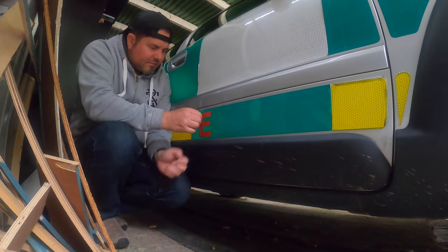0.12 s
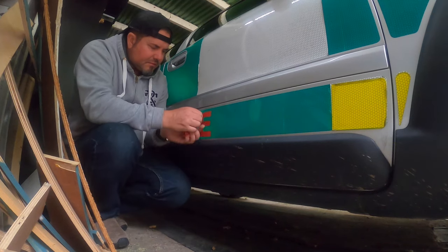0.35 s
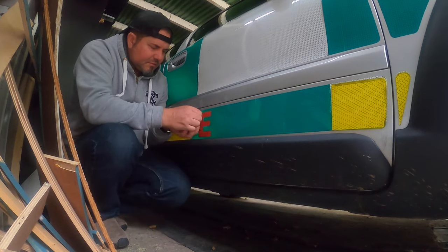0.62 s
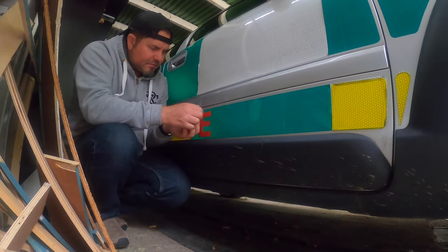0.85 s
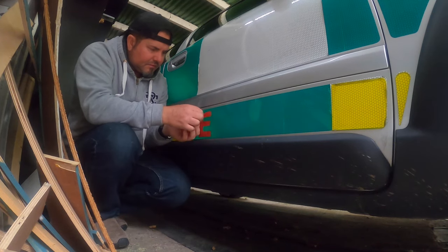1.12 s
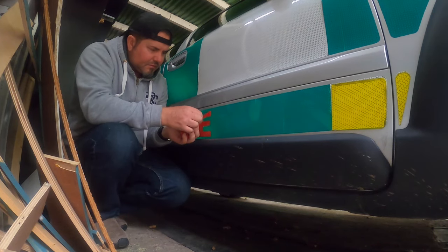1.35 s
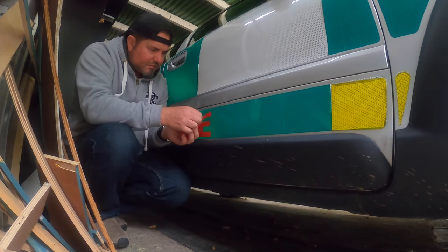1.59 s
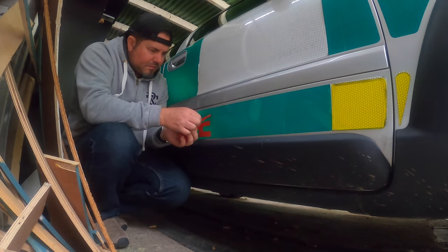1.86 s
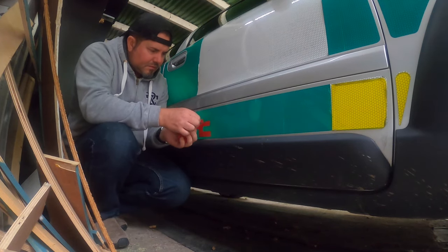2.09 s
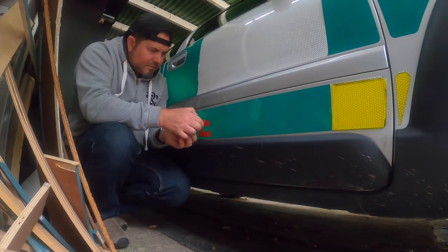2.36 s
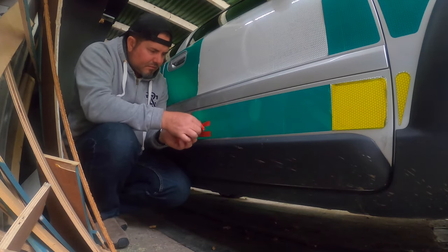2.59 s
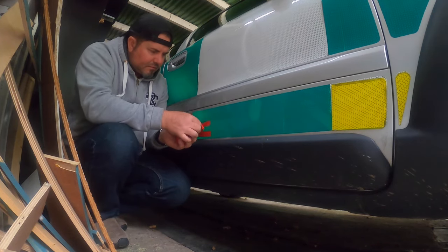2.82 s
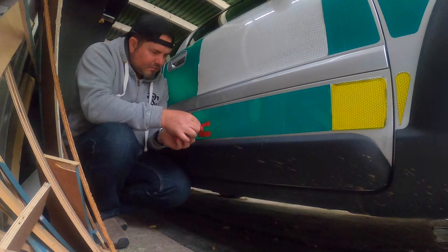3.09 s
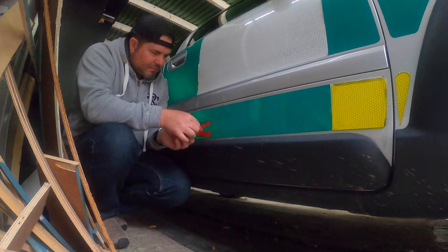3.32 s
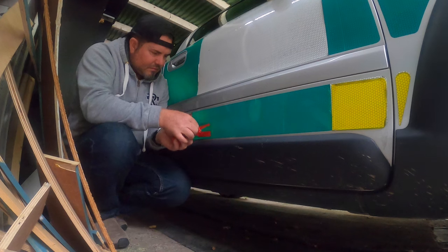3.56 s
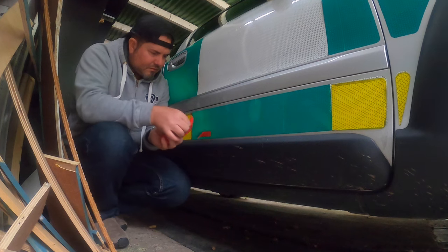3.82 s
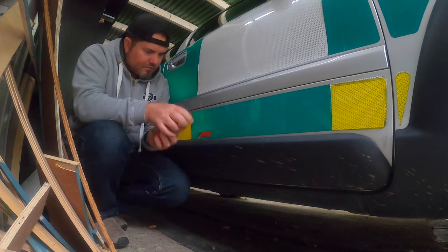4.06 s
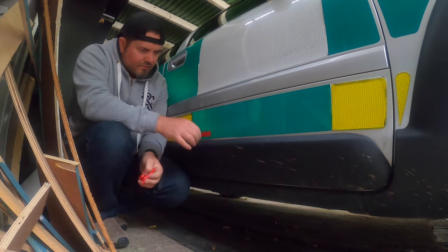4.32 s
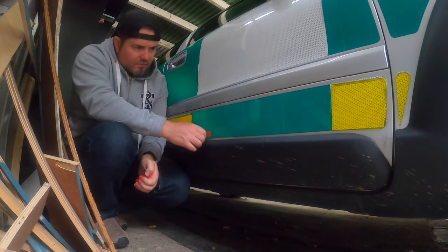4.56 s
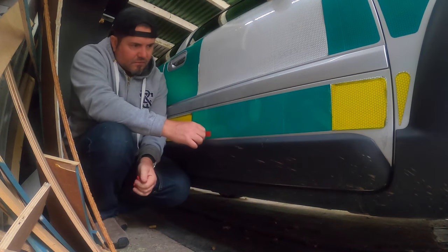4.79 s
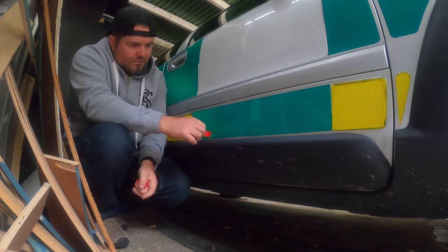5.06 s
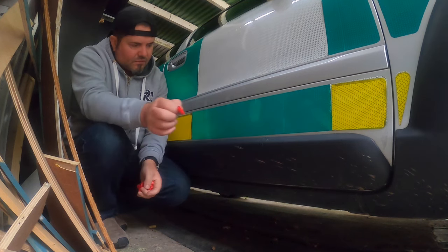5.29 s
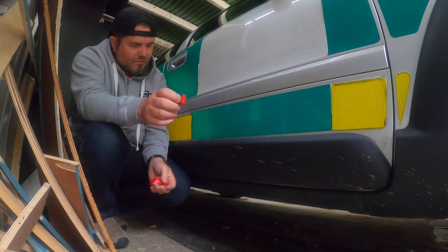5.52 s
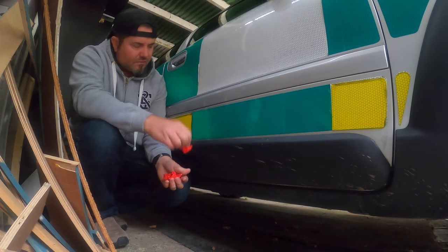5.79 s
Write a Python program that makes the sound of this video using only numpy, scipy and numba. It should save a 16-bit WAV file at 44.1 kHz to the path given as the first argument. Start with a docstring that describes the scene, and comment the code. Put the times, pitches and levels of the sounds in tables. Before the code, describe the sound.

Close stereo pickup, about an arm's length away in a small, nearly dry garage. Fingernails pick vinyl off a car door with sparse, small ticks and soft glue crackle. A sharp snap comes early, a double rap midway, another snap just after. Then a loud snap with a deep panel boom, a dense bright flurry of clicks, a short descending strip, a second boom and a few last ticks over low rumble.

```python
"""Fingernails pick vinyl letters off a car door in a garage, an arm's length from two microphone ports.
Nails tick, scratch and rap as short shaped noise bursts and ringing trim; the film crackles as its glue
lets go, made from random slips sent through resonances. Hard tugs make the door panel boom as ringing modes,
and it creaks in short low noises. A drawn-out strip, a rubbing knuckle and a thin whistle join in
over a low rumble, which swells with two of the booms, and a faint hiss."""
import sys
import numpy as np
from scipy import signal
from scipy.fft import rfft, irfft
from scipy.io import wavfile
from scipy.ndimage import uniform_filter1d
from numba import njit

SR = 44100
rng = np.random.default_rng(int(sys.argv[2]) if len(sys.argv) > 2 else 0)


def unload_wav(signal):
    """Save mono or channel-first audio to the path in sys.argv[1] as 16-bit WAV at rate SR, clipped to [-1, 1]."""
    wavfile.write(
        sys.argv[1],
        SR,
        np.round(np.clip(np.atleast_2d(signal).T, -1, 1) * 32767).astype(np.int16),
    )


def boost_factor(decibels):
    """Convert a level in decibels to a linear amplitude factor."""
    exponent = np.asarray(decibels, float) / 20
    return 10 ** exponent


N = 260626
T = np.arange(N) / SR

# Glue letting go.
# Each row: start in seconds, level in dB of the low hollow, of the middle hollow, and of the treble.
PEEL_LEVELS = [(0.0, -69, -65.5, -85), (0.15, -70.5, -66, -82), (0.24, -66, -61, -73),
               (0.36, -68, -67, -74.5), (0.5, -63.5, -64.5, -65.5), (0.89, -68, -69, -85),
               (0.97, -62, -60.5, -64.5), (1.15, -72, -59, -78), (1.35, -65, -53, -68),
               (1.55, -63.5, -65, -71.5), (1.86, -61, -65.5, -68), (2.3, -65.5, -68.5, -70),
               (2.9, -70.5, -68.5, -76.5), (3.21, -62.5, -58, -67), (3.5, -65, -75, -75),
               (3.8, -57.5, -66, -54), (3.97, -53, -62, -62), (4.03, -62, -75, -113), (4.15, -78, -72, -61),
               (4.25, -56, -57, -50.5), (4.42, -63.5, -75, -55.5), (4.51, -65.5, -68, -74),
               (4.65, -60.5, -67, -57), (4.8, -72, -101, -96), (5.0, -62.5, -62, -57.5),
               (5.2, -51.5, -61, -61), (5.4, -71, -63, -59), (5.66, -74, -82, -65.5),
               (5.91, -79, -67, -65.5)]


def unit(x):
    """Scale to rms 1."""
    return x / np.sqrt(np.mean(x ** 2))


def curve(table):
    """Draw straight lines between the rows of a time table: one value a sample for each column."""
    s, *columns = np.transpose(table)
    return [np.interp(T, s, c) for c in columns]


@njit
def svf(x, hz, width):
    """Band-pass with a centre that may move, gain 1 at the centre."""
    y, b, l = np.empty(len(x)), 0., 0.
    for i in range(len(x)):
        g, k = np.tan(np.pi * hz[i] / SR), width / hz[i]
        v = (b + g * (x[i] - l)) / (1 + g * (g + k))
        b, l, y[i] = 2 * v - b, l + 2 * g * v, k * v
    return y


def svf_twice(x, hz, width):
    """Moving band-pass applied twice, for steeper sides."""
    once = svf(x, hz, 1. * width)
    return svf(once, hz, 1. * width)


def steep(x, hz, width):
    """Fixed band-pass applied twice, rms 1."""
    return unit(svf_twice(x, np.full(len(x), 1. * hz), width))


def coloured(points):
    """Noise with a spectrum of (Hz, dB) points, rms 1."""
    hz, db = np.transpose(points)
    f = np.maximum(np.fft.rfftfreq(N, 1 / SR), 1)
    gain = boost_factor(np.interp(np.log(f), np.log(hz), db))
    return unit(irfft(rfft(rng.standard_normal(N)) * gain, N))


def crackle(share, spread_db, patchy_db):
    """Tiny slips: a share of the samples fire, few of them large, in patches some 20 ms long."""
    fired = rng.random(N) < share
    size_db = spread_db * np.minimum(rng.exponential(size=N), 5)
    patches = uniform_filter1d(np.repeat(rng.standard_normal(N // 600 + 1), 600)[:N], size=600)
    return unit(fired * rng.standard_normal(N) * boost_factor(size_db + patchy_db * patches))


def wander():
    """Slow chance, four new values a second with smooth steps between them, rms 1."""
    k = SR // 4
    return unit(uniform_filter1d(np.repeat(rng.standard_normal(N // k + 1), k)[:N], size=k))


def ports(x):
    """Two microphone ports hear one source with their own level and lag."""
    # Each row: frequency in Hz, left minus right in dB.
    port_levels = [(60, 1), (110, 0.54), (200, 1.5), (380, 0), (700, -0.5), (1290, 1), (2380, 3.5),
                   (4400, 3.5), (8120, -0.5), (15000, -3.5)]
    # Each row: frequency in Hz, how far the left leads in radians.
    port_leads = [(0, -0.12), (600, 0.74), (2700, -0.75), (4600, -0.97), (7300, -1.5), (9600, -1.5),
                  (12000, -1.5), (16000, -2)]
    f = np.maximum(np.fft.rfftfreq(N, 1 / SR), 1)
    hz, level_db = np.transpose(port_levels)
    db = np.interp(np.log(f), np.log(hz), level_db)
    lead = np.interp(f, *np.transpose(port_leads))
    # each port takes half of the difference
    half = boost_factor(db / 2) * np.exp(.5j * lead)
    return irfft(rfft(x) * np.array([half, 1 / half]), N)


def rumble_and_hiss():
    """Low rumble of the garage, swelling as the door booms at 3.97 and 5.35 s; hiss partly unrelated in the ports."""
    # Colour of the rumble. Each row: frequency in Hz, relative level in dB per Hz.
    rumble_colour = [(12, -36), (20, -18), (48, 1.5), (101, -5), (130, 0), (147, -8), (163, -18),
                     (216, -14.5), (243, -28), (274, -24.5), (348, -34), (375, -31.5), (700, -44),
                     (910, -71), (1540, -120)]
    # Level of the rumble, raised where the door booms. Each row: time in seconds, level in dB.
    rumble_levels = [(0.0, -40), (0.62, -39.5), (1.32, -40.5), (1.91, -45), (2.16, -39), (3.65, -40.5),
                     (3.97, -34.5), (4.16, -41), (4.64, -40), (4.95, -42.5), (5.35, -31.5), (5.51, -42),
                     (5.91, -44.5)]
    # Colour of the hiss. Each row: frequency in Hz, relative level in dB per Hz.
    hiss_colour = [(180, 6.5), (300, 0), (571, -10.5), (849, -14), (1140, -17), (1640, -5), (3340, -5),
                   (4000, -4.5), (7620, -12.5), (12300, -30), (15500, -55)]
    side = np.array([[1], [-1]])
    rumble = ports(coloured(rumble_colour)) + 0.028 * side * coloured(rumble_colour)
    hiss = ports(coloured(hiss_colour)) + 0.5 * side * coloured(hiss_colour)
    return boost_factor(curve(rumble_levels)[0]) * rumble + boost_factor(-60) * hiss


@njit
def walls(x, lags, gain, damp):
    """Echoes: eight delay lines that feed each other, duller on every round."""
    line, soft, out = np.zeros((8, 4096)), np.zeros(8), np.zeros((2, len(x)))
    for i in range(len(x)):
        total = 0.
        for k in range(8):
            soft[k] += (1 - damp) * (gain[k] * line[k, (i - lags[k]) & 4095] - soft[k])
            total += soft[k]
            out[k % 2, i] += soft[k]
        for k in range(8):
            line[k, i & 4095] = x[i] + soft[k] - total / 4
    return out


def whistle():
    """A two-strand squeak near the top of hearing: crackling noise in two narrow moving bands."""
    # Each row: time in seconds, pitch in Hz of the upper strand, its level in dB.
    whistle_path = [(.2, 12300, -100), (.27, 12600, -80), (.38, 13800, -76), (.45, 13200, -73),
                    (.53, 12400, -85), (.58, 12150, -100)]
    hz, db = curve(whistle_path)
    air = crackle(share=0.5, spread_db=1.5, patchy_db=4)
    strands = unit(svf(air, hz, 300.)) + 0.6 * unit(svf(air, 0.88 * hz, 400.))
    return boost_factor(db) * strands


def rub():
    """A knuckle judders on the paint; the mid resonances bend up and down with the pressure."""
    # Each row: time in seconds, level in dB, pitch factor for all the rings.
    rub_path = [(.705, -80, 0.95), (.713, -39.5, 0.91), (.73, -41, 0.98), (.745, -46, 0.95),
                (.765, -46.5, 0.86), (.785, -63, 0.92), (.8, -65, 1)]
    # Each row: ring in Hz before the pitch factor, width in Hz, relative level in dB.
    rub_rings = [(600, 150, 6.5), (744, 210, 10), (1176, 300, 9.5), (1335, 120, 8)]
    db, bend = curve(rub_path)
    slips = crackle(share=0.4, spread_db=2.5, patchy_db=2.5)
    rings = sum(boost_factor(ring_db) * svf_twice(slips, hz * bend, width) for hz, width, ring_db in rub_rings)
    return boost_factor(db) * unit(rings)


def strip():
    """The last strip of free film rings lower as it is pulled longer; an overtone grows with it."""
    # Each row: time in seconds, ring in Hz, level of the ring in dB.
    strip_path = [(5.03, 3740, -76), (5.07, 3400, -54), (5.11, 3020, -49.5), (5.14, 2350, -50),
                  (5.19, 2050, -50), (5.23, 1380, -48.5), (5.31, 1010, -47), (5.33, 1050, -75)]
    hz, db = curve(strip_path)
    slips = crackle(share=0.9, spread_db=0.5, patchy_db=1.2)
    tone = unit(svf_twice(slips, hz, 650))
    overtone = unit(svf_twice(slips, 3.1 * hz, 1200))
    sounding = (T > strip_path[0][0]) * (T < strip_path[-1][0])
    return sounding * boost_factor(db) * (tone + 400 / hz * overtone)


def pops():
    """Threads of glue break one by one while the film lifts, each a short scratch in one ring."""
    # Each row: ring in Hz, width in Hz.
    pop_rings = [(1500, 1100), (2300, 1000), (3400, 1100), (4800, 1200), (7500, 880)]
    pops_per_s, spread_db, fade_ms = 70, 8, 4  # the rate holds for each ring
    over_treble_db = -1  # all pops together, against the treble of the peel
    fade = np.exp(-np.arange(512) / SR * 1000 / fade_ms)
    out = 0
    for hz, width in pop_rings:
        size = boost_factor(spread_db * np.minimum(rng.exponential(size=N), 3))
        fired = (rng.random(N) < pops_per_s / SR) * size
        scratches = signal.fftconvolve(fired, fade)[:N] * rng.standard_normal(N)
        out = out + steep(scratches, hz, width)
    treble_db = curve(PEEL_LEVELS)[2]
    return boost_factor(treble_db + over_treble_db) * unit(out)


def peel():
    """Dense glue slips ring in the hollow of the hand, whose middle resonance sinks as the hand draws away."""
    # Air resonances between hand and door: low, upper, treble. Each row: centre in Hz, width in Hz.
    hollows = [(1200, 400), (3200, 600), (6500, 5000)]
    # The hand draws away and the middle hollow sinks.
    # Each row: start in seconds, length in seconds, lowest pitch in Hz.
    draws = [(1.33, 0.15, 1740), (3.1, 0.25, 1870), (4.88, 0.073, 1800)]
    rest_hz, return_s = 2290, 0.14  # the middle hollow and its climb back
    low_db, middle_db, treble_db = curve(PEEL_LEVELS)
    # the upper hollow lies between the middle one and the treble
    upper_db = 1.5 + middle_db + 0.36 * (treble_db - middle_db)
    middle_hz = np.full(N, 1. * rest_hz)
    for s, length, hz in draws:
        middle_hz += np.interp(T, [s, s + length, s + length + return_s], [0, hz - rest_hz, 0])
    drift = 1 + 0.035 * wander()  # the other hollows wander slowly in pitch
    slips = crackle(share=0.28, spread_db=1.5, patchy_db=1.5)
    # the treble comes from fewer, sharper slips
    grains = crackle(share=0.03, spread_db=2.0, patchy_db=5.0)
    out = boost_factor(middle_db) * unit(svf_twice(slips, middle_hz, 560))
    for (hz, width), db, source in zip(hollows, (low_db, upper_db, treble_db), (slips, slips, grains)):
        out = out + boost_factor(db) * unit(svf_twice(source, hz * drift, width))
    return out


def rough_noises():
    """Short rough noises swell and fade: nail scrapes on the film edge, low door creaks, a low tail under a knock."""
    # The low rows at 3.794, 4.632 and 5.267 s are door creaks; the one at 2.46 s is the tail of a knock.
    # Each row: start in seconds, length in ms, level in dB before the swell, centre in Hz, width in Hz.
    noise_list = [(1.09, 19, -39.5, 2320, 1180), (2.227, 32, -43, 2716, 5030), (3.17, 36, -50, 2600, 2200),
                  (3.786, 41, -46.5, 2280, 2490), (3.794, 33, -51, 600, 500), (2.46, 47, -50, 910, 1200),
                  (2.728, 28, -53.5, 3770, 2000), (4.217, 27, -40, 3550, 2500),
                  (4.239, 24.5, -39.5, 2500, 2200), (4.368, 33, -42, 3600, 4000),
                  (4.424, 27, -45.5, 3000, 5000), (4.632, 79, -68, 400, 350), (4.694, 71, -39, 2700, 4200),
                  (4.878, 24, -42.5, 1650, 1190), (4.912, 25, -50.5, 2100, 1600),
                  (5.015, 32, -46, 4400, 4970), (5.267, 40, -44.5, 400, 400), (5.32, 27, -35.5, 1170, 700),
                  (5.51, 28, -46, 3580, 5000)]
    grit, out = crackle(share=0.1, spread_db=2.5, patchy_db=5.0), np.zeros(N)
    for s, ms, db, hz, width in noise_list:
        i, n = int(s * SR), int(ms * SR / 1000)
        swell = np.sin(np.pi * np.arange(n) / n) ** 0.7
        out[i:i + n] += boost_factor(db) * swell * steep(grit[i:i + n], hz, width)
    return out


def knocks():
    """A nail raps the trim strip: each rap rings the same few modes, which buzz unevenly as they fade."""
    # Each row: start in seconds, level in dB, factor on the upper modes for each octave above the lowest.
    knock_list = [(2.463, -29, 0.25), (2.5573, -35, 0.98)]
    # Modes of the trim. Each row: pitch in Hz, level in dB before that factor, seconds to fade by 60 dB.
    trim_modes = [(1036, -4, 0.079), (974, -2.5, 0.034), (1400, -4, 0.076), (1752, -12, 0.04)]
    out, t = np.zeros(N), np.arange(8192) / SR
    hz, mode_db, t60 = np.transpose(trim_modes)[:, :, None]
    for s, db, upper in knock_list:
        turn = rng.random((len(trim_modes), 1))  # random starting points of the waves
        strength = boost_factor(mode_db) * upper ** np.log2(hz / hz.min())
        fade = np.exp(-np.log(1000) * t / t60)
        modes = strength * np.sin(2 * np.pi * (hz * t + turn)) * fade
        buzz = boost_factor(3.3 * np.repeat(rng.standard_normal(64), 128))
        onset = 1 - np.exp(-t / 0.0005)
        i = int(s * SR)
        out[i:i + len(t)] += boost_factor(db) * onset * modes.sum(axis=0) * buzz
    return out


def door():
    """A half-sine push sets the low panel modes ringing; the dense higher modes blur into a rattle."""
    # Pushes on the door skin. Each row: start in seconds, peak of the boom in dB, push length in ms,
    # ring time factor, rattle in dB against the boom's peak.
    thumps = [(0.43, -18.5, 6.4, 0.78, -30), (0.529, -20, 3.6, 0.92, -18), (0.545, -20, 7.6, 0.092, -10.5),
              (0.716, -22, 11.8, 0.11, -33), (3.897, -8.5, 5.75, 1, -19), (4.633, -27, 6.6, 1, -32.5),
              (5.323, -7, 5.1, 0.71, -15)]
    # Modes of the panel. Each row: pitch in Hz, level in dB,
    # seconds to fade by 60 dB before the ring time factor.
    panel_modes = [(51.8, -0.5, 0.59), (74, -11, 0.24), (94.65, -3.5, 0.69), (121.2, 3, 0.22),
                   (171, 6, 0.12), (213.5, 2.5, 0.23), (326.5, -10.5, 0.33), (295, -12, 0.28),
                   (496, -16, 0.15), (575, -18, 0.11), (610, -14, 0.12)]
    hand_stops_s = 4.012  # a palm lands on the panel and damps it
    out, t = np.zeros(N), np.arange(SR // 2) / SR
    hz, mode_db, t60 = np.transpose(panel_modes)[:, :, None]
    for s, db, ms, ring, rattle_db in thumps:
        fade = np.exp(-np.log(1000) * t / (ring * t60))
        modes = (boost_factor(mode_db) * np.sin(2 * np.pi * hz * t) * fade).sum(axis=0)
        push = np.sin(np.pi * np.clip(t[:2048] * 1000 / ms, 0, 1))
        # the air feels the panel's change of speed
        boom = -signal.fftconvolve(modes, np.diff(push))[:len(t)]
        rattle = steep(rng.standard_normal(len(t)), 340, 470)
        rattle = rattle * (1 - np.exp(-t / 0.0023)) * np.exp(-np.log(1000) * t / (ring * 0.23))
        thump = boom / np.abs(boom).max() + boost_factor(rattle_db) * rattle
        if s < hand_stops_s:
            thump = thump * np.exp(-np.maximum(s + t - hand_stops_s, 0) / 0.01)
        i = int(s * SR)
        out[i:i + len(t)] += boost_factor(db) * thump[:N - i]
    return out


def ticks():
    """Nail ticks and film snaps: a crack and a scratch ring their own pitch, the hand's hollow and the treble."""
    # Each row: start in seconds, peak in dB of ring and hollow, ring in Hz,
    # treble in dB against the ring, burst length in ms.
    tick_list = [(0.176, -50.5, 1030, 0, 3.4), (0.517, -49, 6400, -7, 4.2), (0.527, -29, 1310, -39, 4.6),
                 (0.591, -36, 2550, -15, 4.5), (0.677, -42, 1900, 6.5, 3.2), (0.8042, -39, 1400, -21, 4.5),
                 (0.832, -28, 1345, -12, 3.5), (0.898, -47, 3420, 13, 2.7), (0.9374, -51.5, 2200, 12, 2.7),
                 (1.077, -35.5, 3300, -3, 4.1), (1.091, -30, 3250, -47, 5.9),
                 (1.3871, -17.5, 2130, -58, 3.25), (1.8125, -38.5, 3300, -25, 5.2),
                 (1.8665, -41.5, 3230, -28, 2.3), (1.901, -41, 3200, -20, 2.5),
                 (1.966, -35, 3130, -49, 2.7), (2.0108, -42, 2350, -25, 3.3), (2.039, -45, 2290, -11, 2.7),
                 (2.15, -44, 3350, -20, 4), (2.174, -41, 3280, -10, 3.8), (2.193, -43, 5800, -5, 3),
                 (2.2229, -34.5, 1060, -25, 5.7), (2.2384, -31, 1110, -2.5, 4.4),
                 (2.4608, -27, 1780, -10, 6.5), (2.5584, -32, 3450, -2.5, 2.84),
                 (2.69, -33.5, 3350, -8, 3.5), (2.7598, -38.5, 1380, -27, 4.5),
                 (2.777, -43.5, 1500, -40, 5.1), (3.1676, -20.5, 3220, -15, 3.8),
                 (3.332, -35, 3100, -14, 3.8), (3.532, -46.5, 2020, -25, 3.3),
                 (3.571, -40.5, 3340, -12, 3.4), (3.6495, -44, 3460, -1, 21), (3.703, -38.5, 3500, -4, 2.8),
                 (3.7455, -37, 3500, -5, 2.8), (3.774, -38.5, 1170, 4, 3.8), (3.7948, -36, 2000, -13, 6.3),
                 (3.8983, -12, 1227, 3, 2.85), (3.9362, -19, 3830, 5.5, 3.2), (4.154, -44, 5040, -13, 2.2),
                 (4.1871, -32, 3960, -2.5, 10.4), (4.2289, -30.5, 3717, 1.5, 6.2),
                 (4.245, -33.5, 2110, 5, 5.2), (4.3004, -41, 2850, -19, 3.3),
                 (4.3221, -32.5, 6630, -5, 4.9), (4.3557, -36, 4080, -15, 7.6),
                 (4.379, -30.5, 3970, 2, 3.9), (4.425, -34.5, 1580, -20, 5.3),
                 (4.4635, -33, 3200, -8.5, 3.2), (4.54, -45, 4500, -1, 3.5),
                 (4.559, -24.5, 4420, -10, 2.94), (4.5734, -23.5, 3970, -10, 2.64),
                 (4.58, -25.5, 7430, -14, 3.4), (4.6083, -42, 4900, 9, 5.9), (4.622, -33, 4800, 6, 3.5),
                 (4.6545, -36.5, 7260, 6, 2.5), (4.674, -40, 4660, 0, 4), (4.6826, -36, 7250, 7, 3.3),
                 (4.696, -19, 4500, -47, 2.8), (4.707, -33, 4400, 0, 3), (4.724, -38, 4100, 13, 1.8),
                 (4.731, -21.5, 8250, -19, 2.8), (4.7417, -21.5, 4500, -18, 2.9),
                 (4.7452, -15, 1870, -11.5, 2.3), (4.8853, -32.5, 2270, -11, 5.3),
                 (4.9172, -44, 1930, -22, 4), (4.961, -45, 4280, -24, 3.4), (5.01, -33.5, 4640, 0, 4.7),
                 (5.0206, -28.5, 4710, 1.5, 4.34), (5.117, -37.5, 4500, -28, 3.4),
                 (5.1517, -21, 4300, -15, 3.04), (5.293, -40, 4580, -7, 5.1), (5.3217, -13, 1190, -21, 3.2),
                 (5.3328, -27.5, 1220, -2.5, 4.9), (5.391, -40, 4170, -26, 6),
                 (5.5064, -28.5, 7200, 8, 2.8), (5.5234, -30.5, 2840, -7, 3.4), (5.563, -34, 4000, -8, 3.3),
                 (5.6232, -44.5, 2470, -22, 3.3), (5.6819, -43, 5780, 8.5, 3.2), (5.7, -41, 3430, -17, 2.5),
                 (5.7916, -40.5, 4650, -32, 3), (5.8196, -28, 4060, -3.5, 3.8),
                 (5.894, -40.5, 1860, 7, 2.7)]
    out, t = np.zeros(N), np.arange(4096) / SR
    for s, db, hz, treble_db, ms in tick_list:
        length = ms / 1000
        # the longer the scratch, the slower it starts and the weaker its crack
        crack = (0.0056 / length) ** 2 * np.exp(-t / 0.0002)
        scratch = (1 - np.exp(-t / (0.15 * length))) * np.exp(-t / length)
        burst = rng.standard_normal(4096) * (crack + scratch)
        hollow = 0.57 * steep(burst, 2180, 710) + 0.49 * steep(burst, 3577, 880)
        ring = steep(burst, hz, 0.22 * hz) + hollow
        treble = steep(burst, 6180, 4550) + 0.14 * steep(burst, 11170, 2700)
        # a brighter tick also fills the band just above the hollow
        above_hollow = 1.02 * boost_factor(0.26 * treble_db) * steep(burst, 4590, 3050)
        low_mid = boost_factor(-15) * steep(burst, 1764, 690)
        tick = ring + boost_factor(treble_db) * treble + above_hollow + low_mid
        i = int(s * SR)
        out[i:i + 4096] += (boost_factor(db) * tick / np.abs(ring).max())[:N - i]
    return out


def scene():
    """Close sounds heard directly and off the walls, with door booms and whistle, over rumble and hiss."""
    close = ticks() + knocks() + rough_noises() + peel() + pops() + strip() + rub()
    lags = np.array([331, 419, 557, 683, 811, 967, 1151, 1327])  # samples
    room_t60_s, room_db, room_damp = 0.15, -10, 0.073  # the damping shortens the treble further
    gain = boost_factor(-60 * lags / SR / room_t60_s)
    echo = walls(close + 1e-18, lags, gain, room_damp)
    return ports(close + door() + whistle()) + boost_factor(room_db) * echo + rumble_and_hiss()


def low_pass(x):
    """Removes everything above the highest recorded frequency."""
    return signal.sosfilt(signal.butter(12, 16490, fs=SR, output="sos"), x)


def record(dry):
    """The microphones roll off the deepest bass, below 37.6 Hz."""
    bass_cut = signal.butter(2, 37.6, "high", fs=SR, output="sos")
    mix = signal.sosfilt(bass_cut, dry)
    return low_pass(mix)


dry = scene()
out = record(dry)
unload_wav(out)
```